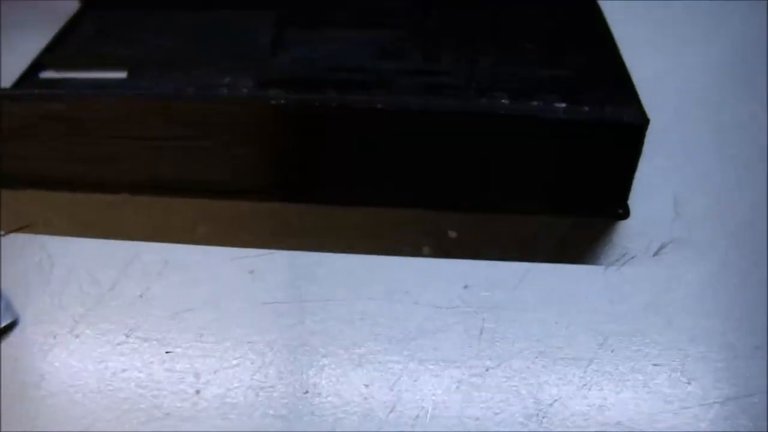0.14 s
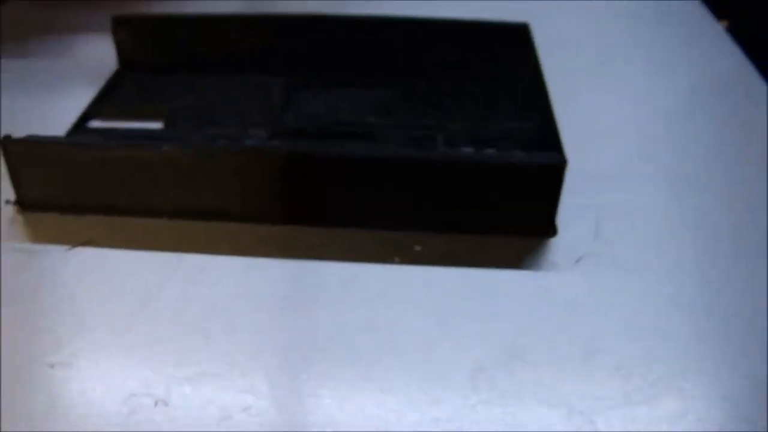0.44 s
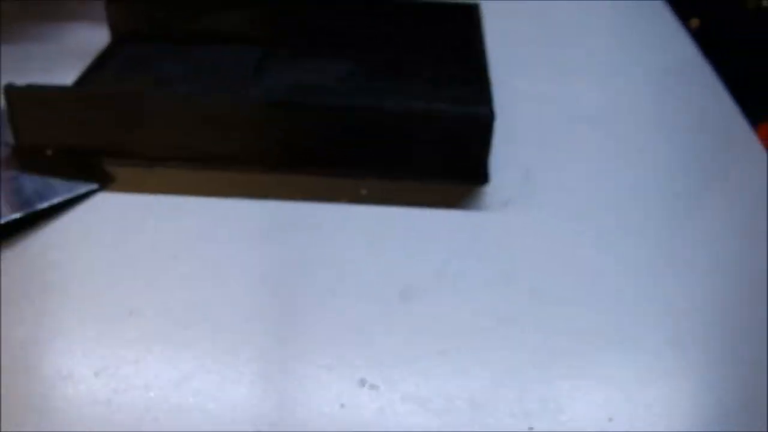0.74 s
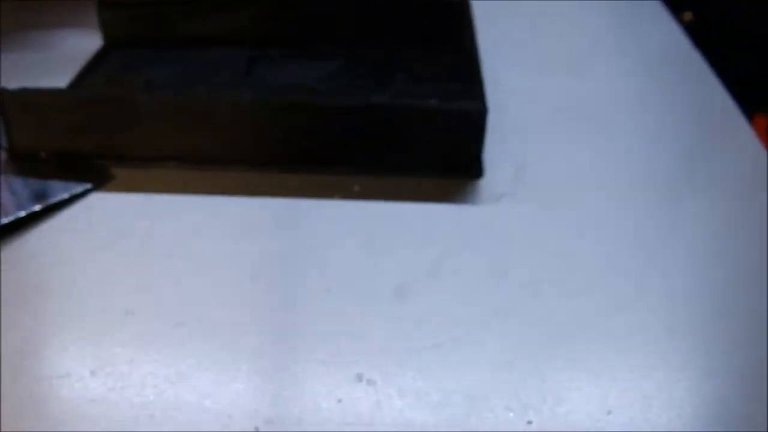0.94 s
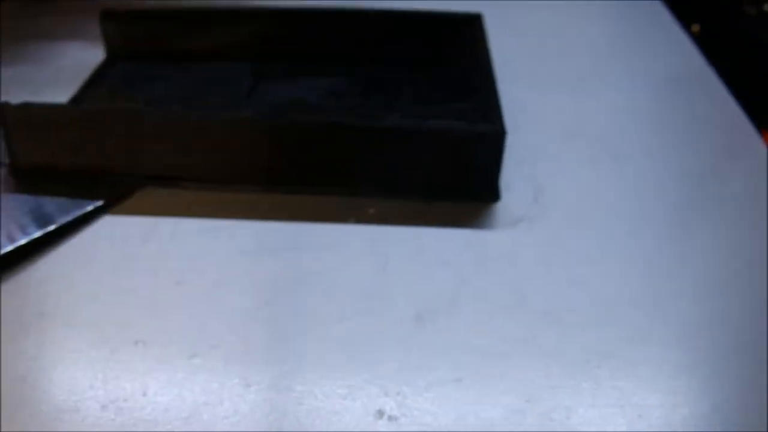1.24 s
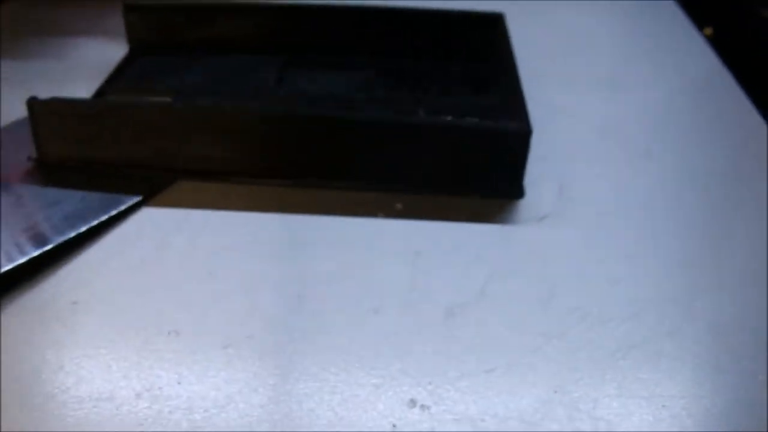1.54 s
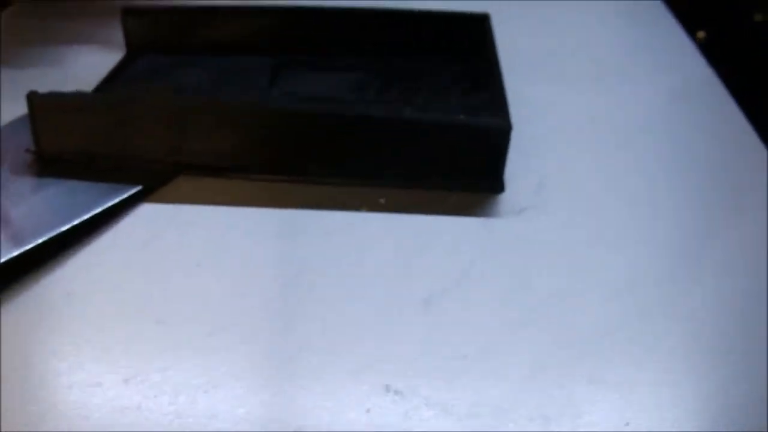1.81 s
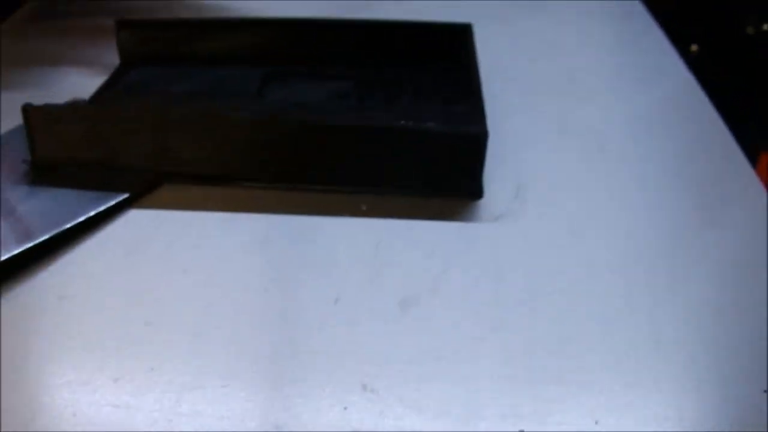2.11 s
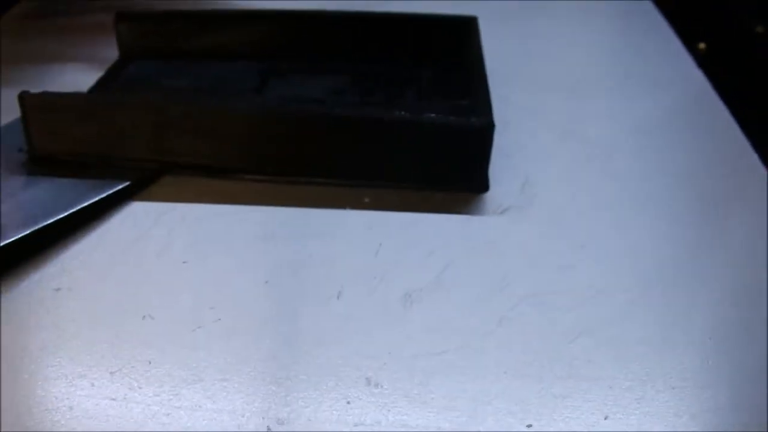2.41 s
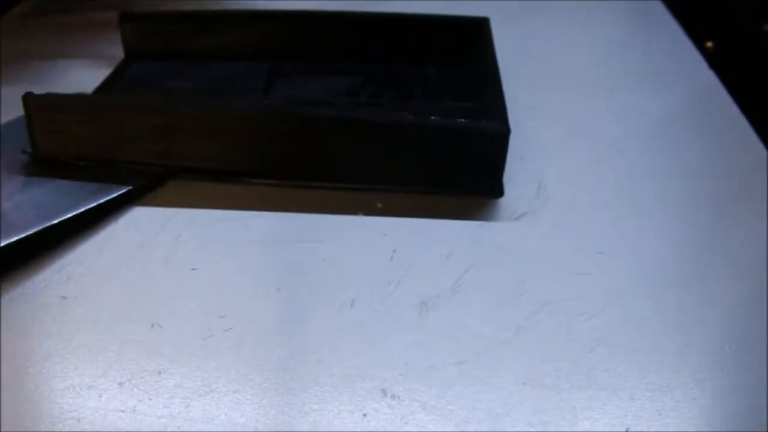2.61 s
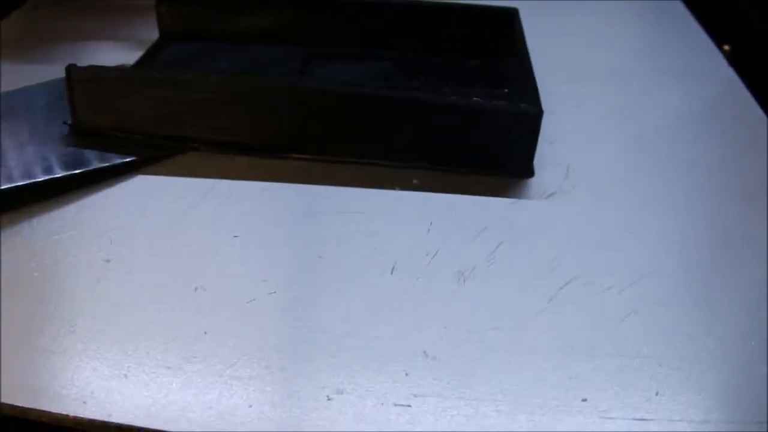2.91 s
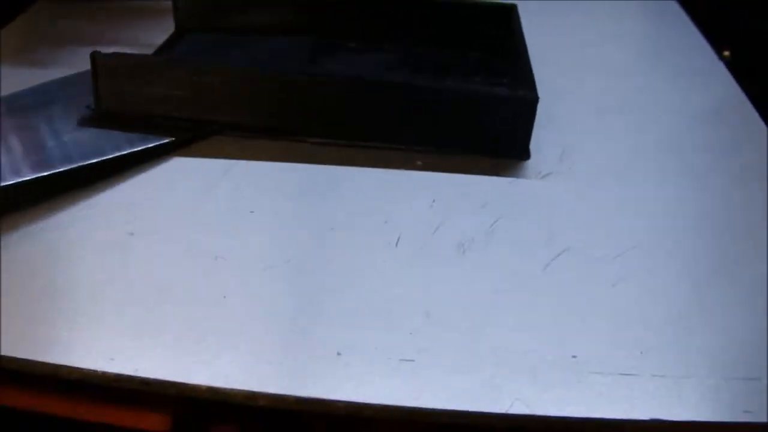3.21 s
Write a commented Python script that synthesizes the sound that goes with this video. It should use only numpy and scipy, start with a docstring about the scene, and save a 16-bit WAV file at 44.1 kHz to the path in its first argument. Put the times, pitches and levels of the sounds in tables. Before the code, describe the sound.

Close to the microphone, a steel blade scrapes and squeaks on a printer plate, snapping loudest before one second; scattered ticks and knocks follow, then a last scrape and pop. The steady fan whine ducks and swells back in a dry room.

```python
"""A steel scraper is worked under a plastic print on a 3D printer's build plate, close to the microphone.
The blade rasps and squeaks as grit and stick-slip pulses drive its resonances; short bursts make its snaps.
The dragged print groans, the plate knocks, shudders and booms as filtered noise and dying tones,
and the printer's cooling fan whines throughout as wavering tones over coloured noise.
The recorder's gain control clamps down on loud snaps, so the fan drops away and swells back."""
import sys
import numpy as np
from scipy import signal
from scipy.fft import rfft, irfft
from scipy.io import wavfile
from scipy.ndimage import uniform_filter1d

SR = 44100
rng = np.random.default_rng(int(sys.argv[2]) if len(sys.argv) > 2 else 0)


def master_out(mix):
    """Clip the mix to full scale and print it as 16-bit PCM to the path in sys.argv[1]."""
    frames = np.transpose(np.atleast_2d(mix))
    ceiling = np.clip(frames, -1, 1)
    pcm = np.round(ceiling * 32767).astype(np.int16)
    wavfile.write(sys.argv[1], SR, pcm)


N = 147735
T = np.arange(N) / SR

# colour of steel on the plate, before any tilt: pitch_hz, density_db (per Hz, relative)
STEEL = [(60, -24), (730, -3), (1100, -6.5), (2200, -3), (4400, 2.5), (5400, -2), (6500, 0), (7500, -12.5),
         (11000, -3.5), (15700, -11)]


def amp(db):
    """Decibels to gain."""
    return 10 ** (np.asarray(db) / 20)


def unit(x):
    """Scales to rms 1."""
    return x / np.sqrt(np.mean(x ** 2) + 1e-20)


def read(points, hz):
    """Reads a spectrum on a log-frequency axis."""
    point_hz, db = np.transpose(points)
    return np.interp(np.log(hz + 1), np.log(point_hz + 1), db)


def level(points):
    """Gain along a level curve, all but silent (-120 dB) outside it."""
    return amp(np.interp(T, *np.transpose(points), left=-120, right=-120))


def add(mix, start_s, sound):
    """Mixes a sound in at a time."""
    part = mix[round(start_s * SR):][:len(sound)]
    part += sound[:len(part)]


def drift(hz):
    """Smooth random wander, rms 1, fading out above the given rate."""
    fade = np.exp(-(np.fft.rfftfreq(N, 1 / SR) / hz) ** 2)
    return unit(irfft(rfft(rng.standard_normal(N)) * fade, N))


def colour(x, points, tilt=0, pitch_hz=None, size=4096):
    """Causal filter from a spectrum, with a tilt in dB per octave and an optional raised resonance."""
    peak_db, peak_octaves = 11, 0.054  # lift, and offset at which half of it is left
    hz = abs(np.fft.fftfreq(size, 1 / SR))
    db = read(points, hz) + tilt * np.log2(np.maximum(hz, 500) / SR)
    if pitch_hz:
        octaves = np.log2((hz + 1) / pitch_hz)
        db = db + peak_db / (1 + (octaves / peak_octaves) ** 2)
    # minimum phase: the filter speaks as early as it can
    spectrum = np.exp(np.conj(signal.hilbert(np.log(amp(db)))))
    response = np.fft.ifft(spectrum).real
    return signal.fftconvolve(x, response[:size // 2])[:len(x)]


def power_db(x):
    """Short-time level, both for setting hits and for the gain control."""
    sense_s = 0.0096
    window = signal.windows.hann(2 * int(sense_s * SR / 2) + 3)
    power = signal.fftconvolve(x ** 2, window / window.sum(), "same")
    return 10 * np.log10(abs(power) + 1e-14)


def modes(table):
    """Dying tones of a struck body."""
    t = T[:SR // 4]
    return sum(amp(db) * 1e-3 ** (t / t60) * np.cos(2 * np.pi * hz * t) for hz, db, t60 in table)


def resonate(x, hz, width_hz):
    """A steep resonance that follows a pitch curve, rms 1: two equal poles, each of the given width."""
    turn = np.exp(2j * np.pi * np.cumsum(hz) / SR)
    pole = np.exp(-np.pi * width_hz / SR)
    # shift the pitch down to zero, smooth, and shift it back up
    smooth = signal.lfilter([1], np.convolve([1, -pole], [1, -pole]), x / turn)
    return unit((turn * smooth).real)


def ring(x, ring_db):
    """Adds the ringing of the steel blade's modes to what excites it."""
    # blade modes: pitch_hz, level_db (relative), t60_s
    blade = [(2374, 7, 0.044), (3108, -2, 0.18), (4540, -1.5, 0.058), (6640, -5, 0.078)]
    ringing = signal.fftconvolve(x, modes(blade))[:len(x)]
    return unit(x) + amp(ring_db) * unit(ringing)


def burst(decay_s, rise_s):
    """A quick cluster of tiny contacts that dies away."""
    t = T[:SR // 4]
    contacts = rng.choice([-1., 1.], len(t))
    return contacts * (1 - np.exp(-t / rise_s)) * np.exp(-t / decay_s)


def fan():
    """A seven-bladed fan: tones locked to the wavering shaft, over the patchy hiss of rushing air."""
    # fan tones: shaft_multiple, level_db (before flutter)
    orders = [(3, -52), (7, -42), (12, -49.5), (14, -49.5), (16, -58), (20, -54), (28, -60)]
    # low hum at shaft speed, which swells and fades as the microphone moves: time_s, level_db
    hum = [(.25, -44), (1.2, -55.5), (1.65, -45.5), (2.45, -50.5), (2.72, -58), (3.05, -48.5)]
    # rush of air through the fan: pitch_hz, density_db (per Hz, relative)
    air = [(25, -39), (100, -10.5), (380, -5.5), (560, -9.5), (780, 4.5), (1100, -9), (1550, 2), (1900, -5),
           (2400, 3.5), (2800, 5), (3130, 1), (3320, -11.5), (4200, -5.5), (6100, -10), (7600, -25),
           (11000, -16.5), (15500, -26.5)]
    # centre of a hump in the hiss, which shifts as the microphone moves: time_s, pitch_hz
    hiss = [(0, 2820), (.26, 2460), (.42, 2950), (3.2, 2820)]
    shaft_hz, waver, flutter_db = 223.05, 0.00052, 0.5  # waver is a fraction of the speed, rms
    air_db, patchy_db = -36.5, 1
    hump_db, hump_width_hz = 4, 220

    turns = np.cumsum(shaft_hz * (1 + waver * drift(4.4))) / SR
    tones = np.zeros(N)
    for multiple, db in [(1, np.interp(T, *np.transpose(hum)))] + orders:
        gain = amp(db + flutter_db * drift(26)) * np.sqrt(2)
        tones += gain * np.sin(2 * np.pi * (round(multiple) * turns + rng.random()))

    z = signal.stft(colour(rng.standard_normal(N), air), nperseg=512)[2]
    patches = uniform_filter1d(rng.standard_normal(z.shape), size=6, axis=0)
    patches = unit(uniform_filter1d(patches, size=8, axis=1))
    hz = np.linspace(0, SR / 2, len(z))[:, None]
    centre_hz = np.interp(np.linspace(0, T[-1], z.shape[1]), *np.transpose(hiss))
    hump = hump_db * np.exp(-((hz - centre_hz) / hump_width_hz) ** 2)
    rush = signal.istft(z * amp(patchy_db * patches + hump))[1][:N]
    return tones + amp(air_db) * unit(rush)


def scrape():
    """Stick-slip pulses and grit excite the blade; its squeak climbs through each stroke."""
    # strokes of the blade, one curve each: time_s, level_db (before the blade rings)
    strokes = [
        [(.3, -45.5), (.39, -36.5), (.435, -37.5), (.46, -51), (.505, -40), (.55, -64)],
        [(.715, -55), (.738, -30.5), (.758, -21), (.797, -13), (.83, -3.5), (.839, -16)],
        [(1.62, -56), (1.64, -34), (1.72, -50), (1.765, -27), (1.8, -27), (1.815, -57)],
        [(2.5, -68), (2.54, -47.5), (2.565, -32.5)],
        [(3.18, -66), (3.235, -40), (3.25, -27), (3.268, -39), (3.28, -65)],
    ]
    # squeak of each stroke against its grit: level_db
    squeak_levels = [-2.5, 2.5, -4, -5, -3]
    # resonances of the pressed blade, which climb as it wedges in: stroke_start_hz, level_db (relative)
    squeak_modes = [(1830, -3.5), (2730, 0.5), (3250, -6), (4080, 4.5), (4950, -1), (5850, -2)]
    squeak_width_hz, squeak_climb, squeak_wander = 163, 0.1645, 0.014  # climb, wander: share of pitch
    grains_per_s, grain_spread_db = 12000, 1.5
    slips_per_s, slip_jitter, slip_db = 750, .22, -0.5  # the edge sticks and slips almost regularly
    chatter_db, chatter_hz = 1.5, 260  # the edge grips and lets go unevenly

    grains = (rng.random(N) < grains_per_s / SR) * rng.choice([-1., 1.], N)
    grains = grains * amp(grain_spread_db * np.minimum(rng.exponential(1, N), 3))
    slip_rate = slips_per_s * (1 + slip_jitter * drift(slips_per_s))
    slips = np.diff(np.floor(np.cumsum(slip_rate) / SR), prepend=0)
    drive = unit(grains) + amp(slip_db) * unit(slips - slips.mean())
    drive = drive * amp(chatter_db * drift(chatter_hz))

    grit = colour(drive, STEEL, tilt=-1.1)
    wander = squeak_wander * drift(33)
    out = np.zeros(N)
    for stroke, squeak_db in zip(strokes, squeak_levels):
        on = (T > stroke[0][0]) & (T < stroke[-1][0])
        climb = 1 + squeak_climb * np.linspace(0, 1, on.sum()) + wander[on]
        squeak = unit(sum(amp(db) * resonate(drive[on], hz * climb, squeak_width_hz)
                          for hz, db in squeak_modes))
        rasp = unit(unit(grit[on]) + amp(squeak_db) * squeak)
        out[on] += rasp * level(stroke)[on]
    return ring(out, ring_db=-11.5) * out.std()


def groan():
    """The print groans as it drags on the plate: noise through one low, gliding resonance."""
    # one curve for each drag: time_s, level_db, pitch_hz
    drags = [
        [(.31, -34, 767), (.42, -43, 695), (.541, -42.5, 710)],
        [(2.066, -39, 730), (2.125, -33, 720)],
    ]
    out = np.zeros(N)
    for drag in drags:
        s, db, hz = np.transpose(drag)
        tone = resonate(rng.standard_normal(N), np.interp(T, s, hz), width_hz=105)
        out += tone * level(np.c_[s, db])
    return out


def snaps():
    """Sharp cracks that ring the blade, as the print lets go and the edge slips."""
    # snaps: start_s, peak_level_db (short-time), decay_s, brightness_db_per_octave, strongest_pitch_hz
    cracks = [(0.4302, -29, 0.0035, -2, 5220), (0.8169, 4.5, 0.0013, 3, 4300),
              (0.8278, 3.5, 0.0047, -1, 3180), (0.8925, -8.5, 0.0031, 0.5, 5340),
              (1.1351, -10.5, 0.0056, -0.5, 2250), (1.425, -31, 0.0052, 5, 12000),
              (1.44, -29, 0.01, 8, 11100), (1.5547, -31, 0.0033, 2.5, 10800),
              (1.7837, -15, 0.011, 7.5, 5800), (1.7956, -12, 0.0032, 2, 5340),
              (2.0863, -23.5, 0.0031, -0.5, 10100), (2.1266, -26, 0.0068, -0.5, 9800),
              (2.5628, -19.5, 0.0023, 9.5, 10100), (3.1871, -23.5, .005, 3, 4300),
              (3.207, -33.5, 0.0038, 2, 10300), (3.24, -11, 0.00096, 0.5, 2160),
              (3.255, -18, 0.0047, 0, 6400), (3.2624, -12, 0.0043, -2, 4640),
              (3.319, -26.5, 0.0034, 5, 4700)]
    out = np.zeros(N)
    for start_s, db, decay_s, tilt, pitch_hz in cracks:
        crack = colour(burst(decay_s, rise_s=0.00057), STEEL, tilt, pitch_hz)
        crack = ring(crack, ring_db=-15)
        add(out, start_s, crack * amp(db - power_db(crack).max()))
    return out


def shudder():
    """Low shudder of the bed under the hand: coloured noise along a level curve."""
    # swell of the shudder: time_s, level_db
    swell = [(.72, -55), (.86, -23.5), (1.18, -67), (1.25, -32.5), (1.36, -64), (1.66, -43), (1.85, -38.5),
             (2.03, -62), (2.11, -33.5), (2.21, -49.5), (2.35, -42.5), (2.65, -64.5), (2.85, -45.5)]
    # colour of the shudder: pitch_hz, density_db (per Hz, relative)
    bed = [(30, -53), (110, -14.5), (200, 3.5), (270, -6), (360, 4), (550, -8.5), (4000, -30)]
    return unit(colour(rng.standard_normal(N), bed)) * level(swell)


def knocks():
    """Dull knocks and bounces of the print: a hit and a faint rattle excite its modes on the plate."""
    # knocks: start_s, peak_level_db (short-time), rattle_decay_s
    hits = [(1.2287, -22, 0.009), (1.7779, -24.5, 0.022), (2.109, -36, 0.017), (2.2352, -22, 0.0026),
            (2.2405, -27, 0.0045), (2.2495, -37, 0.0057)]
    # modes of the print on the plate: pitch_hz, level_db (relative), t60_s
    plate = [(653, -8.5, 0.028), (708, 3, 0.05), (950, -3, 0.025), (1188, -3, 0.025), (1790, -9, .02),
             (2380, -11, .015)]
    rattle_db = -19.5
    body = modes(plate)
    out = np.zeros(N)
    for start_s, db, decay_s in hits:
        contacts = signal.unit_impulse(SR // 4) + amp(rattle_db) * burst(decay_s, rise_s=0.0012)
        knock = signal.fftconvolve(contacts, body)
        add(out, start_s, knock * amp(db - power_db(knock).max()))
    return out


def boom():
    """The hand leans on the bed, which booms softly: one low tone that swells and dies."""
    start_s, peak_db, pitch_hz, rise_s = 2.752, -38, 198.3, .022
    out, t = np.zeros(N), T[:SR // 4]
    swell = (t / rise_s * np.exp(1 - t / rise_s)) ** 2
    add(out, start_s, amp(peak_db) * swell * np.sin(2 * np.pi * pitch_hz * t))
    return out


def thump():
    """Push of air as the print pops loose: a pressure jump, then a weak, fading suction."""
    start_s, peak_db, push_s = 3.2406, -12, 0.0013
    out, u = np.zeros(N), T[:SR // 4] / push_s
    add(out, start_s, amp(peak_db) * (1 - u) * np.exp(-u))
    return out


def room(x):
    """Short, dull reflections from the printer's frame and the workshop, as decaying noise."""
    t60_s, dull_hz = 0.13, 4860
    t = T[:SR // 2]
    tail = rng.standard_normal(len(t)) * (t > .003) * amp(-60 * t / t60_s)
    tail = signal.lfilter(*signal.butter(1, dull_hz, fs=SR), tail)
    return signal.fftconvolve(x, tail / np.linalg.norm(tail))[:N]


def scene():
    """The scraping in its room, over the fan."""
    room_db = -12
    work = scrape() + groan() + snaps() + shudder() + knocks() + boom() + thump()
    return (work + amp(room_db) * room(work) + fan())[None]


def record(dry):
    """Gain control falls within milliseconds on loud sounds and recovers slowly; then the band limit."""
    limit_db, recover_db_per_s, smooth_s = -27.5, 21.5, 0.0019
    edge_hz = 16000
    over_db = np.maximum(power_db(dry[0]) - limit_db, 0)
    # a running maximum against a rising ramp holds each duck, then lets it go steadily
    recovery = recover_db_per_s * T
    duck_db = np.maximum.accumulate(over_db + recovery) - recovery
    keep = np.exp(-1 / (smooth_s * SR))
    ducked = dry * amp(-signal.lfilter([1 - keep], [1, -keep], duck_db))
    lowpass = signal.firwin(401, edge_hz, window=("kaiser", 8), fs=SR)
    return signal.oaconvolve(ducked, lowpass[None], "same")


dry = scene()
out = record(dry)
master_out(out)
```